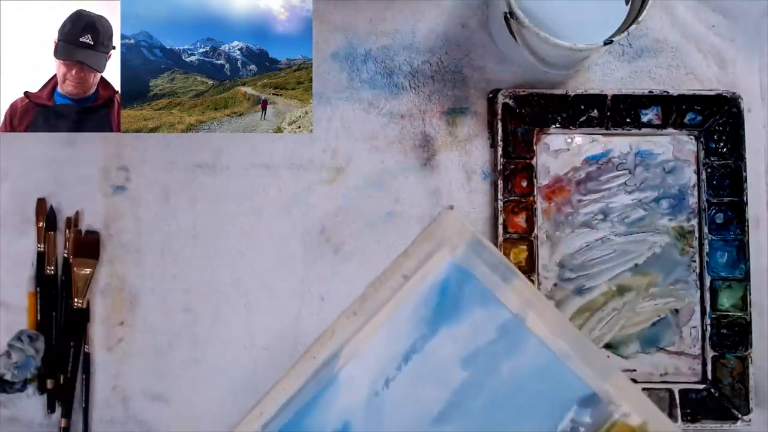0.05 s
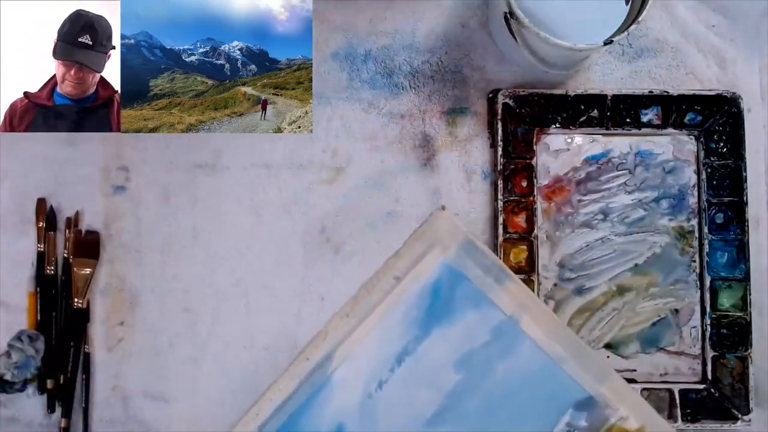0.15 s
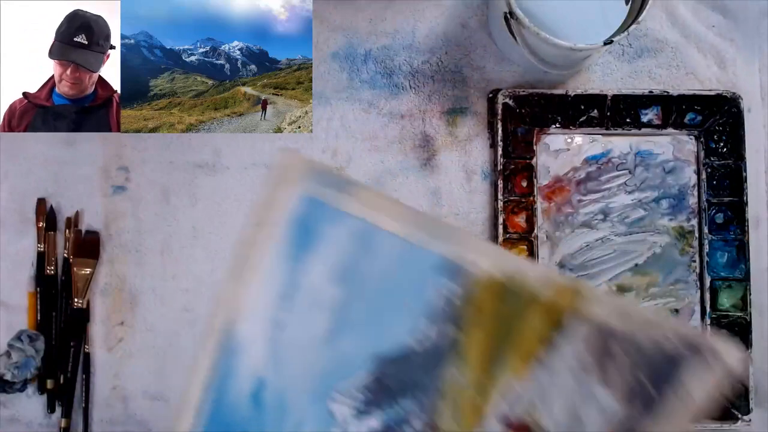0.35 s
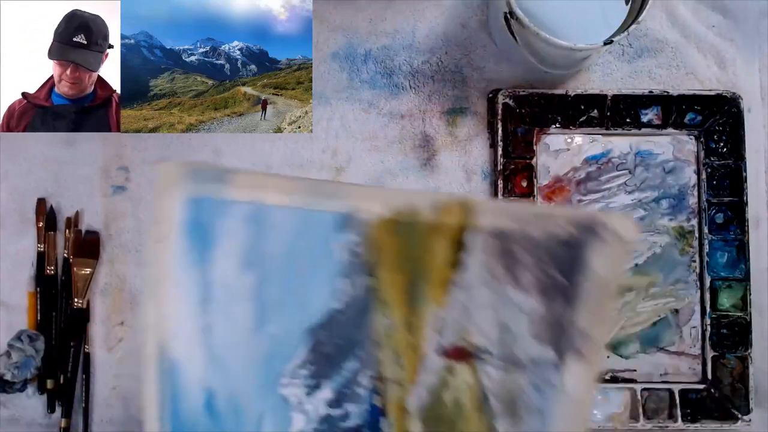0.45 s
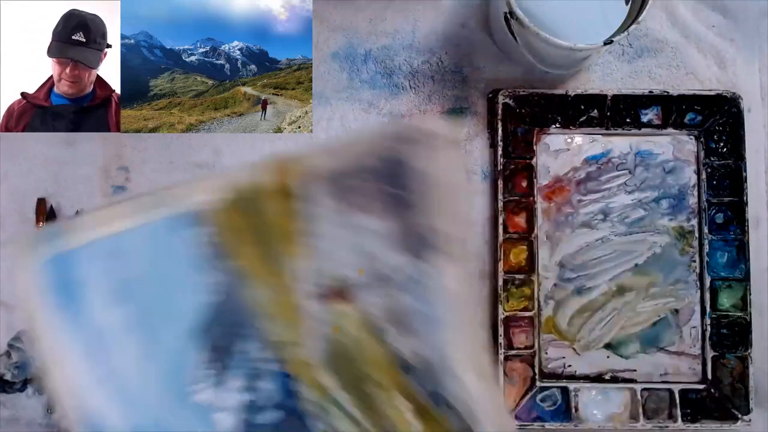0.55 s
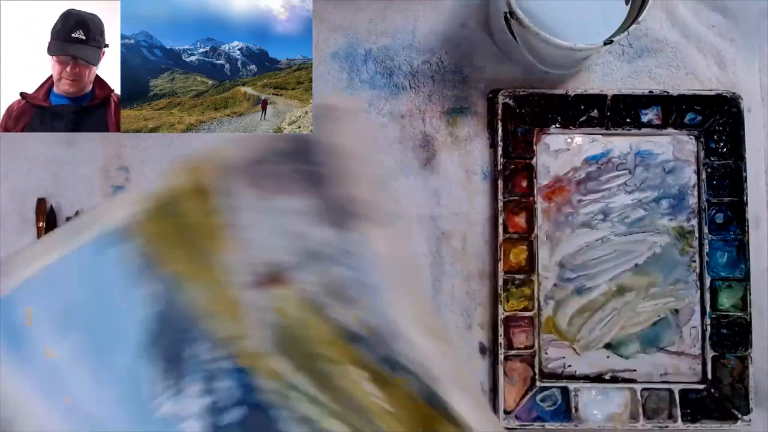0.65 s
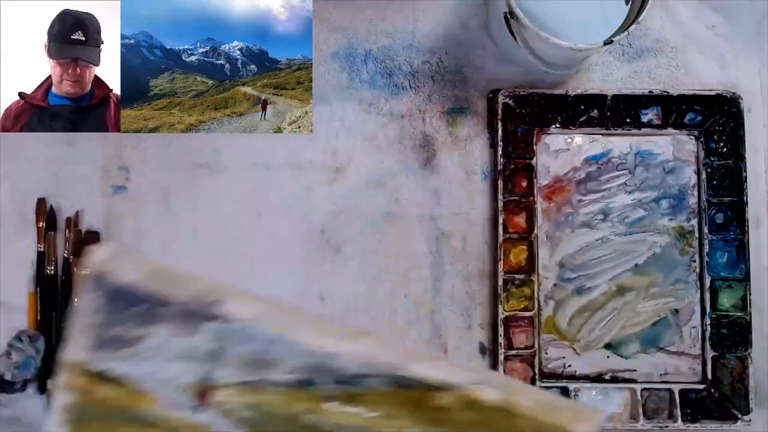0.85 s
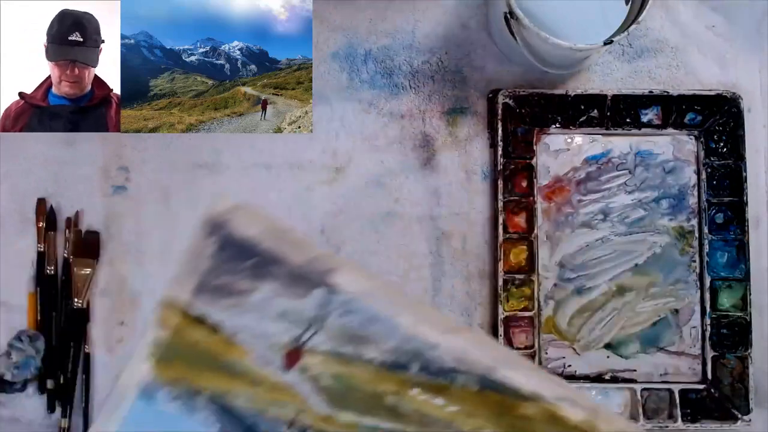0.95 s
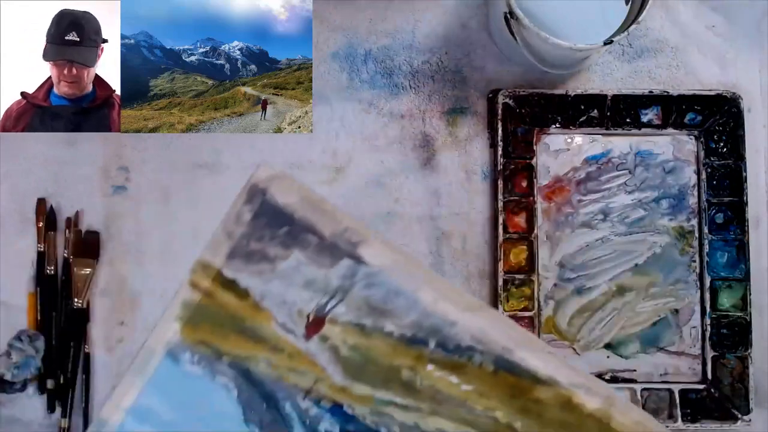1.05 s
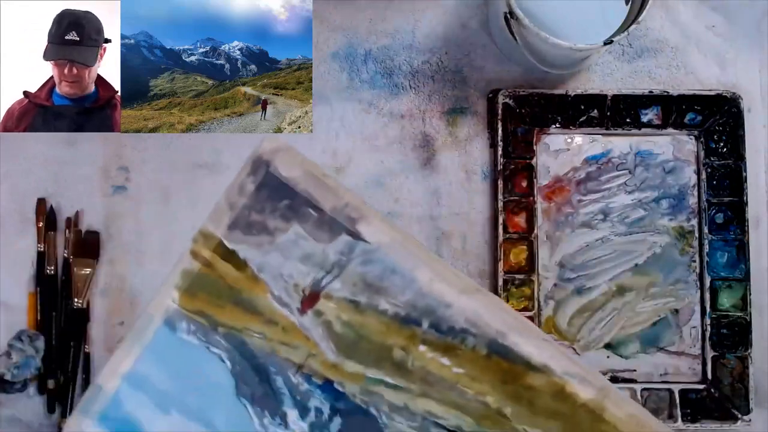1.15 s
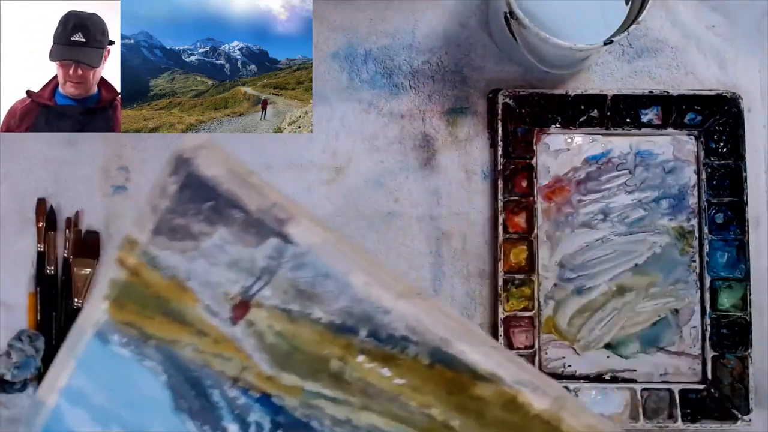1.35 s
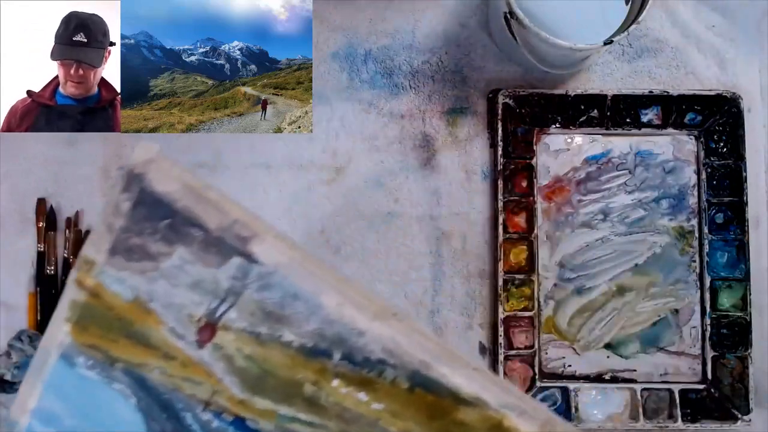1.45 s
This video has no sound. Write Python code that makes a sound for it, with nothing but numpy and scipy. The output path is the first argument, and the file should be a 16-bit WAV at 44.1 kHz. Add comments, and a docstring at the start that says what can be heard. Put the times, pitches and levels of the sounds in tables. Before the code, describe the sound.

Masking tape is ripped off a paper sheet, close up in a small room. After a brief paper rustle, the pull runs from about 0.2 to 0.7 seconds: a dense, bright crackle with snaps, dipping briefly under faint ringing tones near 0.3 and 0.6 seconds and ending in a sharp snap. From 0.9 to 1.5 seconds the sheet slides and crinkles softly, with two faint handling bumps over quiet room hush.

```python
"""A small room, close to the microphone: masking tape is ripped off the edge of a sheet of paper
in one half-second pull. The glue lets go in a dense crackle with louder snaps, ringing the taut
strip near 8.7 kHz. Early on the crackle drops out under a brief frozen, ringing chord, like a
digital stretch glitch; two shorter dips with chords follow. Before and after the pull, the sheet
slides and rustles in the hands, over the steady hush of the room."""
import sys
import numpy as np
from scipy import signal
from scipy.fft import rfft, irfft
from scipy.io import wavfile
from scipy.ndimage import uniform_filter1d

SR = 44100
rng = np.random.default_rng(int(sys.argv[2]) if len(sys.argv) > 2 else 0)


def dump_mix(stems):
    """Bounce the given channels to the path in sys.argv[1] as a 16-bit WAV at rate SR."""
    frames = np.atleast_2d(stems).T  # one column per channel
    limited = np.clip(frames, -1, 1)  # hard clip at full scale
    pcm = np.round(limited * 32767).astype(np.int16)
    wavfile.write(sys.argv[1], SR, pcm)


N = 66150
T = np.arange(N) / SR

# colour of the room tone: f/Hz, level/dB
HUSH_COLOUR = [(20, -4), (70, -7), (130, -8.5), (260, -11.5), (450, -16.5), (900, -21), (2000, -26),
               (4000, -29), (4600, -21.5), (5200, -31), (8000, -27.5), (16000, -33.5)]
# soft knocks of the hands on the sheet: t/s, level/dB
HAND_KNOCKS = [(1.084, -59), (1.442, -55.5)]
# paper sliding in the hands: peak t/s, rise/s, decay/s, level/dB, tilt/(dB per octave)
PAPER_SLIDES = [(.004, 0.017, 0.022, -34.5, -1.5), (0.174, 0.036, 0.051, -41.5, -1.5),
                (0.216, 0.033, .01, -41.5, -2), (0.924, 0.03, 0.021, -57.5, 0),
                (.962, 0.0062, 0.016, -50, 0), (0.987, .008, 0.014, -52, -1.5),
                (1.035, 0.052, .025, -56.5, 2), (1.082, 0.008, 0.0037, -37.5, 6),
                (1.091, 0.0073, 0.021, -38.5, 3.5), (1.394, 0.018, 0.024, -60.5, 0),
                (1.454, 0.012, .015, -61.5, -2)]
# colour of sliding paper: f/Hz, level/dB
SLIDE_COLOUR = [(100, -21.5), (400, -7.5), (900, -9.5), (1400, -2), (2100, 3), (2700, 3), (3600, 2),
                (4800, 2.5), (5900, 1), (8200, 3.5), (10000, -1), (13000, -6), (16000, -12)]
# crinkles of the loose tape and paper: t/s, level/dB, f/Hz, width/Hz, decay/s
PAPER_CRINKLES = [(.003, -27, 5000, 9000, .0012), (.8857, -47, 4500, 5000, .002),
                  (.886, -33, 13500, 4500, .002), (.896, -44, 12500, 5000, .007),
                  (.9475, -41, 4900, 2000, .0012), (.9625, -44, 4900, 900, .003),
                  (1.249, -56, 3800, 3000, .002), (1.33, -59, 7000, 5000, .004),
                  (1.383, -54, 6500, 5000, .002)]
# rasps of the tugged or rubbed sheet: peak t/s, rise/s, decay/s, level/dB, f/Hz, width/Hz
SHEET_RASPS = [(.605, .04, .045, -38, 1970, 380), (.61, .03, .04, -38, 5700, 600),
               (.96, .012, .014, -50, 4850, 1100), (1.083, .01, .016, -46, 4100, 1300),
               (1.096, .016, .012, -45, 2800, 1300)]
# dips of the crackle under the frozen chords: centre t/s, length/s, dip/dB
CRACKLE_DIPS = [(.319, .058, -13), (.563, .026, -8), (.606, .028, -7)]
# tones of the frozen, ringing chords: centre t/s, length/s, f/Hz, relative level/dB
CHORD_TONES = [(.322, .06, 262, -39), (.31, .042, 1276, -37), (.32, .055, 1965, -35),
               (.312, .045, 2778, -38), (.312, .04, 4303, -38), (.312, .04, 4554, -38),
               (.314, .038, 5062, -34), (.32, .045, 5749, -39), (.312, .04, 7235, -34),
               (.318, .045, 7660, -33), (.32, .05, 8795, -29), (.314, .04, 9550, -33),
               (.566, .04, 1934, -37), (.564, .035, 3436, -39), (.562, .035, 4602, -35),
               (.562, .035, 5092, -37), (.566, .035, 5835, -36), (.563, .035, 6261, -33),
               (.566, .04, 6664, -33), (.565, .03, 8658, -29), (.605, .06, 1915, -38), (.6, .06, 2030, -40),
               (.608, .03, 3686, -39), (.605, .04, 5632, -38), (.606, .04, 5824, -37),
               (.605, .04, 6543, -33), (.607, .03, 8645, -33)]
# louder snaps of the glue: t/s, peak level/dB
GLUE_SNAPS = [(.2128, -19), (.2148, -20), (.2272, -17), (.2338, -12), (.2411, -15), (.2476, -11),
              (.2494, -13), (.2635, -15), (.2855, -15), (.2904, -14), (.2970, -14), (.3065, -10),
              (.3335, -13), (.3358, -12), (.3432, -14), (.3498, -12), (.3579, -14), (.3842, -14),
              (.3878, -14), (.4774, -16), (.4828, -13), (.4879, -12), (.4941, -13), (.4989, -13),
              (.5211, -13), (.5450, -13), (.5464, -12), (.5557, -10), (.6210, -13), (.6327, -13),
              (.6896, -7)]
# colour of a snap: f/Hz, level/dB
SNAP_COLOUR = [(150, -34), (400, -23), (2000, -18), (4500, -17), (7000, -6), (8700, 0), (9600, -2),
               (10600, -11), (16000, -16)]
# colour of the sheet's jerk as the tape comes free: f/Hz, level/dB
JERK_COLOUR = [(40, -9), (110, -2), (300, -5), (700, 0), (2000, 2), (4000, -5), (10000, -18)]
# course of the pull: t/s, then relative level/dB of paper body, strip ring and top treble
PULL_LEVELS = [(0.22, -27, -24, -41), (0.232, -28, -30.5, -37), (0.272, -27.5, -26.5, -49),
               (0.302, -31, -20, -64), (0.392, -34.5, -26, -33.5), (0.418, -39.5, -32.5, -36.5),
               (0.492, -35.5, -29.5, -36), (0.534, -33, -29.5, -26.5), (0.546, -34, -23.5, -28.5),
               (0.568, -34.5, -25, -42), (0.588, -28, -24, -27), (0.612, -42.5, -29.5, -28.5),
               (0.62, -32.5, -29.5, -29.5), (0.682, -32.5, -30.5, -37.5), (0.69, -29.5, -38, -38),
               (0.7, -17, -33, -48)]
# colour of the crackle in the paper's body: f/Hz, level/dB
BODY_COLOUR = [(180, -33), (450, -19.5), (750, -8), (1100, 1), (1500, -0.5), (2000, 4.5), (2700, 3),
               (4000, 2.5), (5200, 2.5), (6500, 6), (7600, -1.5), (10000, -8)]
# colour of the crackle's top treble: f/Hz, level/dB
TREBLE_COLOUR = [(7000, -20), (9600, 3), (10500, -4), (12000, 0), (13300, -9.5), (16000, -6.5)]
# course of the sheet's low rumble against its body: t/s, relative level/dB
RUMBLE_LEVELS = [(.23, 6.5), (.285, 4), (.31, 1), (.335, -19), (.36, 0.5), (.42, 4.5), (.52, 8.5),
                 (.545, 9), (.565, -5), (.61, -1.5), (.65, -3), (.69, 7)]
# colour of that rumble: f/Hz, level/dB
RUMBLE_COLOUR = [(30, -24), (110, -20), (200, -8), (330, -0.5), (500, 2.5), (700, -3.5), (1200, -18)]
# bass of the sheet flapping loose: t/s, level/dB
FLAP_LEVELS = [(.22, -74), (.26, -62), (.29, -70), (.32, -82), (.4, -65), (.49, -63), (.56, -73),
               (.64, -61), (.695, -63)]
# colour of the flapping: f/Hz, level/dB
FLAP_BASS_COLOUR = [(30, -21), (70, -10), (110, 0), (170, -2), (260, 5), (400, -24), (900, -41)]

PULL_START_S, PULL_END_S, PULL_EDGE_S = .226, .694, .0058
RING_HZ, RING_WIDTH_HZ = 8650, 2200
FRICTION_GRAINS_PER_S, FRICTION_SPREAD_DB = 7000, 6.5


def undb(db):
    """Decibels to gain."""
    return 10 ** (np.asarray(db) / 20)


def unit(x):
    """Scale to rms 1."""
    return x / np.sqrt(np.mean(x ** 2) + 1e-20)


def noise():
    """White noise for the length of the scene."""
    return rng.standard_normal(N)


def colour(x, points, size=2048):
    """Minimum-phase filter through points of f/Hz, level/dB."""
    hz, db = np.array(points, float).T
    bins_hz = np.maximum(np.fft.rfftfreq(size, 1 / SR), 1)
    gain = undb(np.interp(np.log(bins_hz), np.log(hz), db))
    cepstrum = irfft(np.log(gain))
    cepstrum[1:size // 2] *= 2  # folding the cepstrum makes the filter causal
    cepstrum[size // 2 + 1:] = 0
    return signal.fftconvolve(x, irfft(np.exp(rfft(cepstrum))))[:N]


def resonate(x, hz, width_hz, passes=1):
    """Pass through one resonance; more passes steepen its skirts. Output at rms 1."""
    b, a = signal.iirpeak(hz, hz / width_hz, fs=SR)
    for _ in range(passes):
        x = signal.lfilter(b, a, x)
    return unit(x)


def grains(per_s, spread_db):
    """Random tiny clicks, most weak and a few strong; rms 1."""
    hits = rng.random(N) < per_s / SR
    sign = rng.choice([-1, 1], N)
    strength = np.minimum(rng.exponential(size=N), 3.5)
    return unit(hits * sign * undb(spread_db * strength))


def swell(peak_s, rise_s, decay_s):
    """Exponential rise to a peak and fall from it."""
    return np.exp(-np.maximum((peak_s - T) / rise_s, (T - peak_s) / decay_s))


def burst(start_s, decay_s):
    """Sudden start, exponential fall."""
    return swell(start_s, 1 / SR, decay_s)


def arch(centre_s, length_s):
    """Half a cosine: a rounded swell and fade."""
    return np.cos(np.pi * np.clip((T - centre_s) / length_s, -.5, .5))


def contours(table):
    """One gain curve for each level/dB column that follows t/s."""
    times, *levels = np.array(table).T
    return [undb(np.interp(T, times, db)) for db in levels]


def room_tone(level_db=-62):
    """The steady, mostly low hush behind everything."""
    return undb(level_db) * unit(colour(noise(), HUSH_COLOUR))


def room(x, tail_share=1, low_t60_s=.33, treble_t60_s=.31, split_hz=6000):
    """Direct sound, quick reflections from the desk, then a short tail whose treble dies first."""
    diffuse = noise()
    low = signal.sosfiltfilt(signal.butter(10, split_hz, fs=SR, output="sos"), diffuse)
    treble = diffuse - low
    tail = low * undb(-60 * T / low_t60_s) + .67 * treble * undb(-60 * T / treble_t60_s)
    early = noise() * burst(start_s=.00086, decay_s=.0093)
    response = (tail_share * undb(-8) * unit(tail) + undb(-9) * unit(early)) / np.sqrt(N)
    return x + signal.fftconvolve(x, response)[:N]


def knocks():
    """Dull, low bumps of the hands as the sheet is turned."""
    thud = resonate(noise(), hz=74.4, width_hz=58, passes=2)
    return thud * sum(undb(db) * swell(t, rise_s=.018, decay_s=.018) for t, db in HAND_KNOCKS)


def handling():
    """The sheet slides under the fingers with a fine grain, and crinkles now and then."""
    out = np.zeros(N)
    for t, rise, decay, db, tilt in PAPER_SLIDES:
        tilted = [(hz, level + tilt * np.log2(hz)) for hz, level in SLIDE_COLOUR]
        friction = grains(FRICTION_GRAINS_PER_S, FRICTION_SPREAD_DB)
        out += undb(db) * swell(t, rise, decay) * unit(colour(friction, tilted))
    for t, db, hz, width, decay in PAPER_CRINKLES:
        out += undb(db) * burst(t, decay) * resonate(noise(), hz, width)
    return out


def rasps():
    """In each rasp, fine friction grains ring one resonance of the sheet."""
    out = np.zeros(N)
    for t, rise, decay, db, hz, width in SHEET_RASPS:
        friction = grains(FRICTION_GRAINS_PER_S, FRICTION_SPREAD_DB)
        out += undb(db) * swell(t, rise, decay) * resonate(friction, hz, width, passes=2)
    return out


def frozen_chords(waver_hz=6, wavers_per_s=80, trim_db=-1):
    """Brief ringing chords of barely wavering sines, like a digital stretch glitch."""
    out = np.zeros(N)
    for t, length, hz, db in CHORD_TONES:
        waver = waver_hz * unit(uniform_filter1d(noise(), int(SR / wavers_per_s)))
        tone = np.sqrt(2) * np.sin(2 * np.pi * np.cumsum(hz + waver) / SR)
        out += undb(db + trim_db) * arch(t, length) * tone
    return out


def snaps():
    """Larger patches of glue give way at once; at the end the freed sheet jerks."""
    out = np.zeros(N)
    for t, db in GLUE_SNAPS:
        snap = colour(noise() * burst(t, decay_s=.0003), SNAP_COLOUR)
        out += undb(db) * snap / np.abs(snap).max()
    jerk = burst(start_s=.6882, decay_s=.003) * unit(colour(noise(), JERK_COLOUR))
    return out + undb(-29) * jerk


def rip(fizz_db=-3):
    """Glue threads break in a dense crackle that drives the paper and the taut strip; returns both."""
    breaks = grains(per_s=2600, spread_db=3.2)

    def crackle():
        """The same breaks with fresh signs, over a fine fizz."""
        return breaks * rng.choice([-1, 1], N) + undb(fizz_db) * noise()

    def band(points):
        """Coloured crackle at rms 1."""
        return unit(colour(crackle(), points))

    body_gain, ring_gain, treble_gain = contours(PULL_LEVELS)
    strip = undb(-1) * ring_gain * resonate(crackle(), RING_HZ, RING_WIDTH_HZ, passes=2)
    rumble = undb(-18.5) * body_gain * contours(RUMBLE_LEVELS)[0] * band(RUMBLE_COLOUR)
    flap = contours(FLAP_LEVELS)[0] * band(FLAP_BASS_COLOUR)
    body = undb(-.5) * body_gain * band(BODY_COLOUR)
    treble = treble_gain * band(TREBLE_COLOUR)
    inside_pull_s = np.minimum(T - PULL_START_S, PULL_END_S - T)
    pulling = np.clip(inside_pull_s / PULL_EDGE_S + .5, 0, 1)
    return pulling * (body + rumble + flap + treble), pulling * strip


def peel(strip_dip_share=.16):
    """The whole pull, close up: crackle that dips under each frozen chord, and snaps over it."""
    paper, strip = rip()
    dip_db = sum(db * arch(t, length) for t, length, db in CRACKLE_DIPS)
    crackle = undb(dip_db) * room(paper)
    ring = undb(strip_dip_share * dip_db) * room(strip, tail_share=.75)
    return crackle + ring + room(snaps()) + frozen_chords()


def scene():
    """Room tone at the back, hands, paper and tape close to one microphone."""
    hush = room_tone()
    return (peel() + room(handling() + rasps()) + knocks() + hush)[None]


def record(dry):
    """The recorder cuts the very top, above 15.7 kHz."""
    return signal.sosfilt(signal.ellip(10, .2, 70, 15700, fs=SR, output="sos"), dry)


dry = scene()
out = record(dry)
dump_mix(out)
```